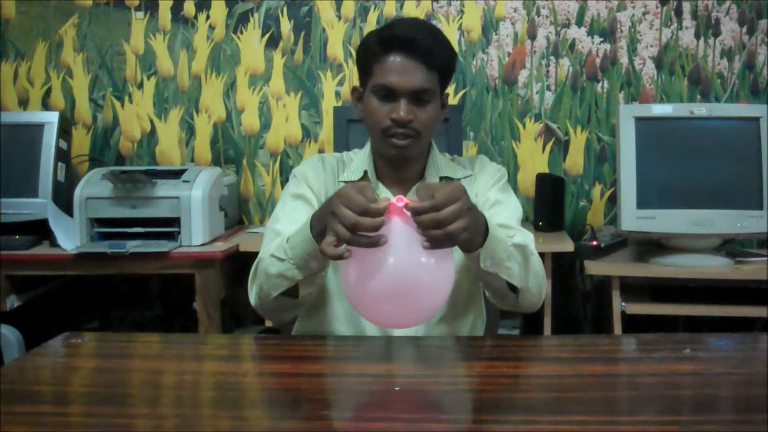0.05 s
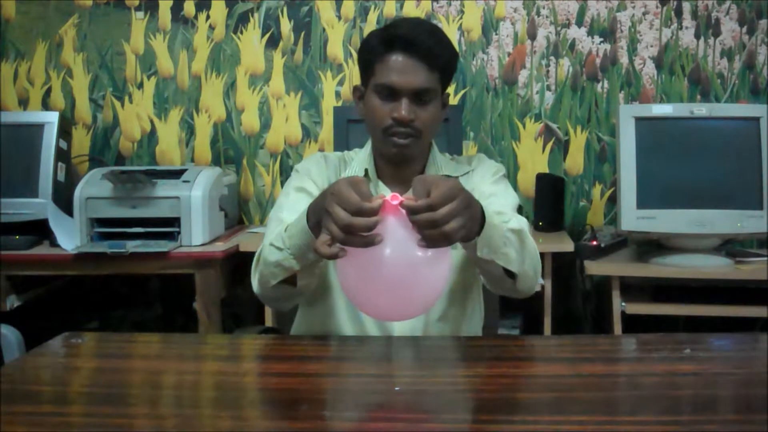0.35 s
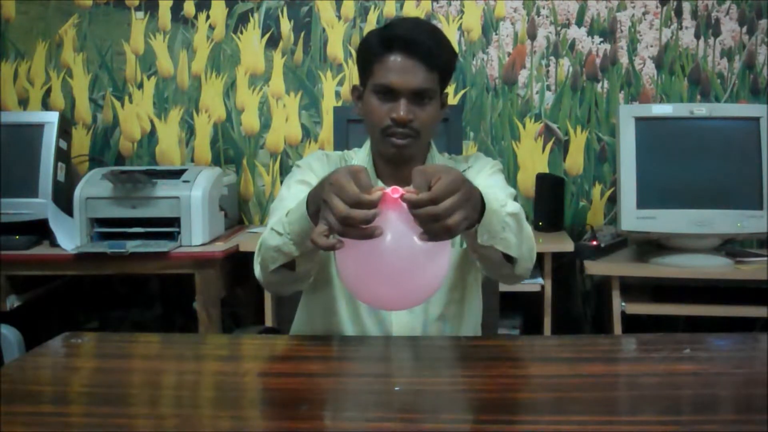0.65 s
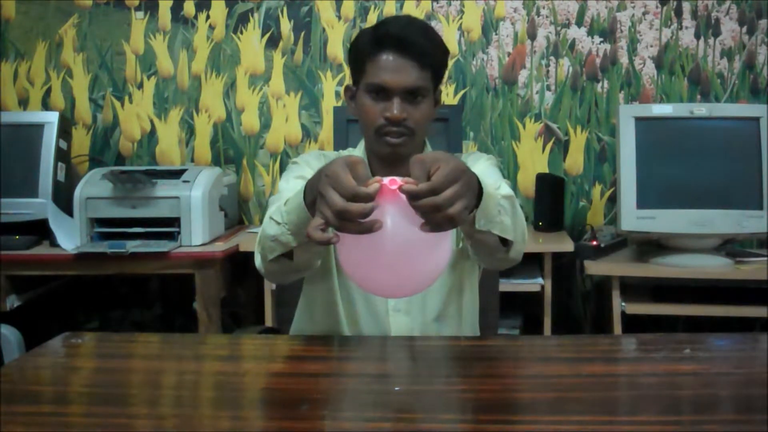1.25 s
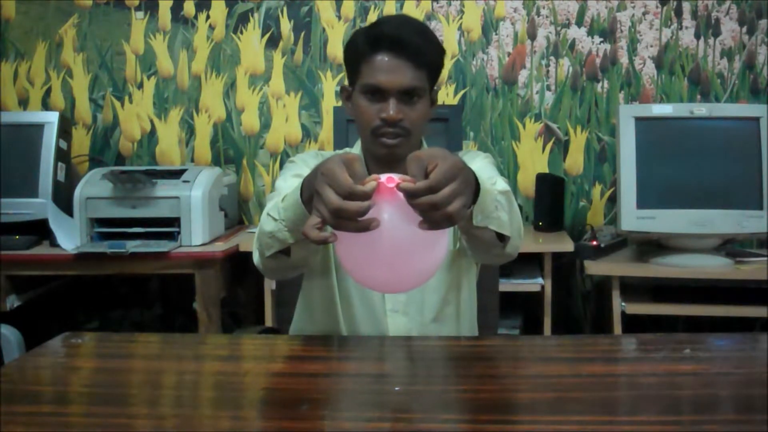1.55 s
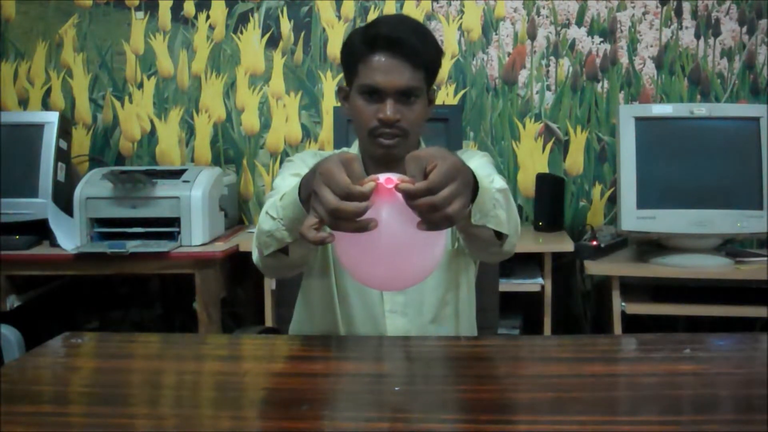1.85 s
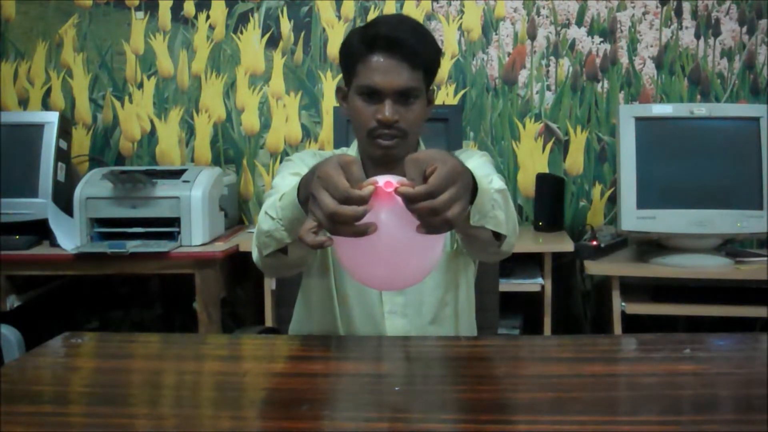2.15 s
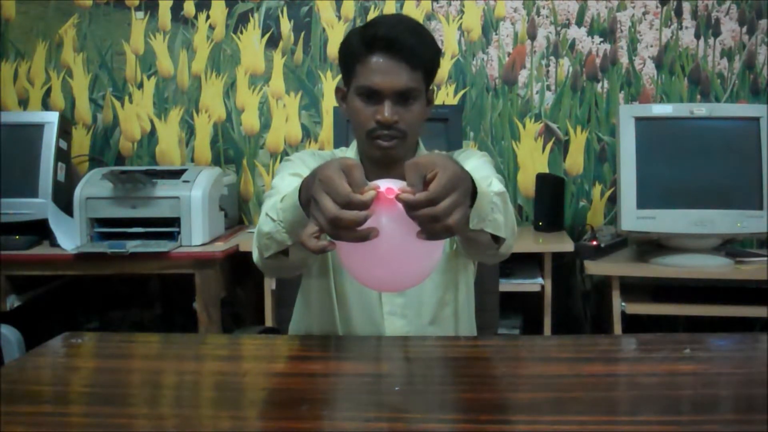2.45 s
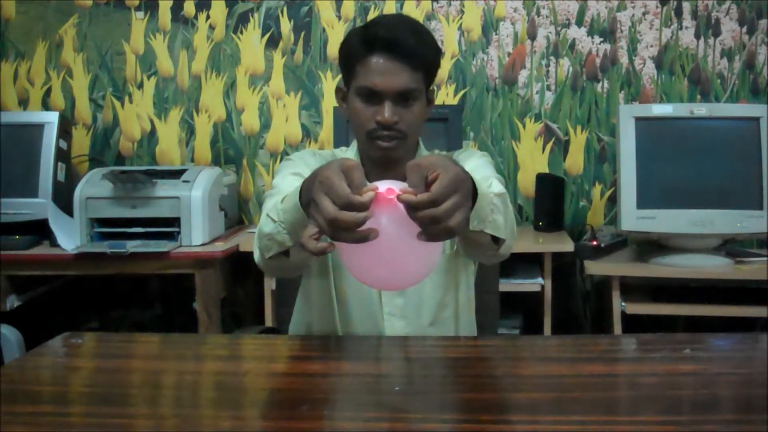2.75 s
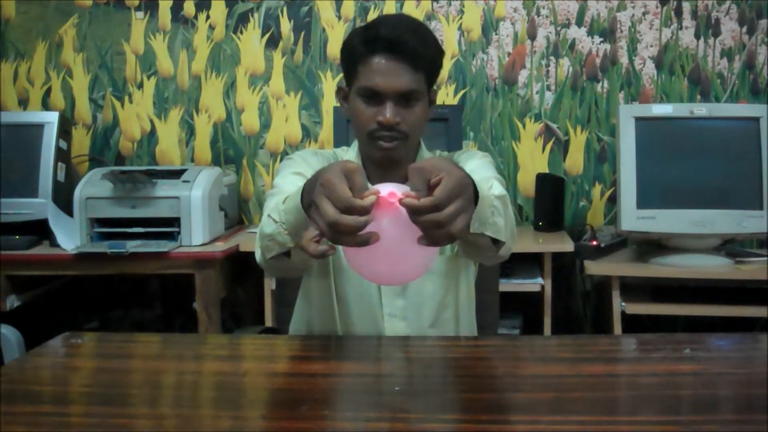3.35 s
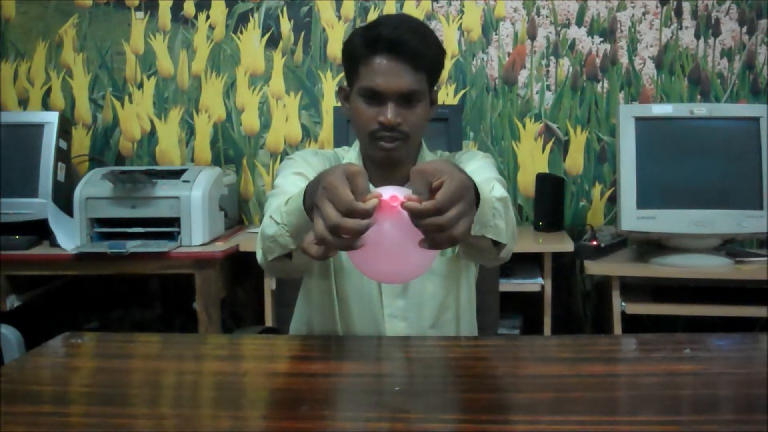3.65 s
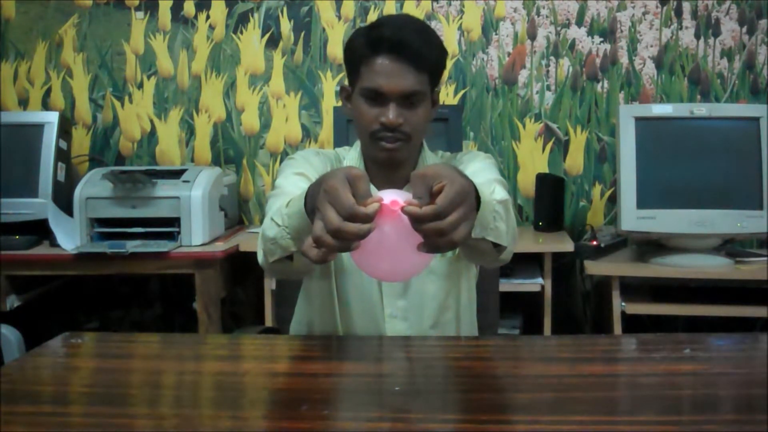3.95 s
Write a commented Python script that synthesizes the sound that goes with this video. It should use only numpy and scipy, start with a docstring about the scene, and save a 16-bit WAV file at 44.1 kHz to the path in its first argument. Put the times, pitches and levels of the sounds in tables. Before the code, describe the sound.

A balloon squeals for the whole four seconds as air escapes through its stretched neck. The high, shrill note warbles from about 0.2 to 0.6 seconds, then takes on a rubbery buzz. Its pitch sags slightly, and from about 2 seconds it grows increasingly ragged and hissy while staying about as loud. The small office adds a short echo, a faint equipment hum and a low rumble.

```python
"""Air squeals out through the stretched neck of a balloon in a small office.
The rubber lips slap shut about 950 times a second; the note warbles briefly, then a slower flap
of the neck makes it buzz. As the balloon empties the pitch sags and the squeal turns ragged and
hissy. Office equipment hums faintly behind, over a low room rumble."""
import sys
import numpy as np
from scipy import signal
from scipy.fft import rfft, irfft
from scipy.io import wavfile

SR = 44100
rng = np.random.default_rng(int(sys.argv[2]) if len(sys.argv) > 2 else 0)


def output_pcm(signal):
    """Save a mono or channel-first signal as 16-bit PCM at the path in sys.argv[1].

    Samples are clipped to [-1, 1] before scaling.
    """
    pcm = np.clip(np.atleast_2d(signal).T, -1, 1) * 32767
    wavfile.write(sys.argv[1], SR, np.round(pcm).astype(np.int16))


N = 176400
T = np.arange(N) / SR
BINS_HZ = np.maximum(np.arange(N + 1) * SR / (2 * N), 1)


def squeal(phase, strength):
    """The harmonics of the slapping rubber lips, locked into one sharp pulse per cycle."""
    # Level rides, before weighting. Each row: time in seconds, level of the fundamental in dB.
    first = [(0.0, -40), (0.15, -34.5), (0.19, -41.5), (0.6, -32), (0.73, -42), (0.78, -33.5), (0.87, -30),
             (0.96, -42.5), (1.05, -31.5), (1.1, -49), (1.21, -31), (1.35, -53.5), (1.4, -30),
             (1.86, -34.5), (2.08, -32), (2.15, -50), (2.19, -35), (2.28, -31.5), (2.72, -38.5),
             (2.75, -31), (3.02, -41), (3.06, -31), (3.61, -31.5), (3.8, -40.5), (3.94, -32), (4.0, -41)]
    # Each row: time in seconds, level of harmonic 2 in dB.
    second = [(0.0, -29.5), (0.09, -29.5), (0.32, -31.5), (0.87, -24.5), (0.91, -29.5), (1.14, -24.5),
              (1.17, -33.5), (1.25, -22), (1.55, -30.5), (1.71, -26.5), (1.75, -42), (1.77, -26.5),
              (1.97, -33.5), (2.04, -29.5), (3.97, -35), (4.0, -25)]
    # Each row: time in seconds, levels of harmonics 3, 4 and 5 in dB.
    upper = [(0.02, -30, -30, -25.5), (0.67, -26.5, -27.5, -25), (0.71, -38, -29.5, -18),
             (0.75, -27, -26, -30), (0.78, -30, -28, -20), (0.98, -27, -29, -24.5), (1.01, -30, -36, -24),
             (1.03, -26.5, -24.5, -19.5), (1.17, -32, -32, -27.5), (1.22, -26, -26.5, -25.5),
             (1.35, -32.5, -27, -24), (1.4, -27.5, -21, -27), (1.48, -33, -39, -27), (1.51, -27, -29, -30),
             (1.93, -31.5, -30.5, -28.5), (2.29, -31.5, -31, -27.5), (2.37, -35.5, -31.5, -30.5),
             (2.86, -31.5, -29, -25), (3.36, -35, -29.5, -28.5), (3.91, -29, -26.5, -25),
             (3.97, -32, -30, -26), (3.98, -30, -24, -26)]
    # Each row: time in seconds, levels of harmonics 6, 7 and all higher ones in dB.
    shrill = [(0.02, -27, -29, -21.5), (0.03, -19, -25, -22), (0.11, -19, -21.5, -20.5),
              (0.26, -22, -23.5, -25.5), (0.27, -15, -22, -24), (0.28, -20.5, -26, -26),
              (0.49, -27, -23.5, -23), (0.78, -26.5, -19.5, -23.5), (0.89, -28.5, -24, -23),
              (1.4, -25, -22, -21.5), (2.15, -31, -26, -22.5), (2.18, -28, -32, -21.5),
              (2.34, -26, -35, -17.5), (2.39, -30.5, -46, -24.5), (2.84, -22, -25.5, -19.5),
              (3.39, -29, -33, -21), (3.85, -25.5, -25, -21.5), (3.86, -22, -23, -20),
              (3.97, -24, -28, -23), (3.98, -28, -25, -21)]
    # Each entry: the weight in dB added to one harmonic's ride, lowest first.
    weights_db = [-2.5, -5.5, -1, 1.5, 3, -1, .5, -2.5, -8, -12.5, -14.5, -20, -23.5, -28.5, -29.5]
    sixth, seventh, treble = in_time(shrill)
    rides = in_time(first) + in_time(second) + in_time(upper) + [sixth, seventh]
    rides += [treble] * (len(weights_db) - len(rides))
    harmonics = (from_db(ride + weight) * np.sin(k * phase)
                 for k, (ride, weight) in enumerate(zip(rides, weights_db), 1))
    return np.sqrt(2) * strength * sum(harmonics)


def lip_motion(rough):
    """Phase and strength of the slaps, pushed about by the warble, the neck's flap and turbulence."""
    # The sagging note. Each row: time in seconds, slap rate in Hz.
    slap_rate = [(0, 983.6), (.15, 984.8), (.3, 1001), (.4, 981.1), (.55, 976.3), (.66, 951.4), (.88, 961),
                 (1.0, 940.2), (1.15, 949.5), (1.35, 941.7), (1.47, 908), (1.62, 900.8), (1.76, 915.6),
                 (1.9, 903.7), (2.12, 897), (2.25, 887.7), (2.34, 871.7), (2.44, 898.7), (2.62, 899.3),
                 (2.9, 895), (3.2, 881.5), (3.45, 879.4), (3.7, 899.5), (4, 898)]
    # The early warble. Each row: time in seconds, pitch swing in Hz.
    warble_swing = [(.12, 0), (.2, 16), (.3, 28), (.42, 38), (.52, 18), (.64, 0)]
    # The buzz of the flapping neck. Each row: time in seconds, depth from 0 to 1.
    flap_depth = [(0, 0), (.12, 0.48), (.24, 0), (.54, .02), (.7, 0.87), (1.5, 0.78), (2.6, 0.99),
                  (3.2, 0.47), (4, 0.56)]
    # Flap harmonics at full depth, lowest first. Each row: timing shift in cycles, strength swing 0-1.
    flap_shape = [(0.014, 0.12), (0.02, 0.23), (0.0051, 0.16)]
    warble_hz, warble_crest_s, swell_db_per_hz = 24.7, .312, 0.0886
    flap_hz, flap_wander_hz = 152.4, 1.79
    wander_hz, wander_per_s, jitter_cycles = 6, 25.17, 0.055
    shimmer_db, surge_db = -0.5, 1
    (pitch,), (swing,), (depth,) = in_time(slap_rate), in_time(warble_swing), in_time(flap_depth)
    warble = swing * np.cos(2 * np.pi * warble_hz * (T - warble_crest_s))
    phase = running_phase(pitch + warble + wander_hz * rough * drift(wander_per_s))
    phase += 2 * np.pi * jitter_cycles * rough * drift(per_s=137)
    shimmer = shimmer_db * rough * drift(per_s=110)
    surge = surge_db * drift(per_s=73)
    strength = from_db(shimmer + swell_db_per_hz * warble + surge)
    flap = running_phase(flap_hz + flap_wander_hz * drift(wander_per_s))
    for k, (shift, share) in enumerate(flap_shape, 1):
        phase += 2 * np.pi * shift * depth * np.sin(k * flap)
        strength *= 1 + share * depth * np.cos(k * flap)
    return phase, rms_one(strength)


def hiss(phase, strength, rough):
    """A puff of air each cycle rings the slit; the hiss grows louder and fuller as the lips roughen."""
    # Air rushing through the slit. Each row: frequency in Hz, relative level in dB.
    air_colour = [(400, -54), (750, -15.5), (1400, -14), (1750, -6), (2400, -6.5), (3200, -7.5),
                  (3700, -5.5), (5200, -6), (6400, 2.5), (8000, 0), (9500, -3.5), (12000, -15),
                  (14500, -24)]
    # The slit's gliding resonance. Each row: time in seconds, centre in Hz.
    slit_centre = [(0, 7700), (.8, 7350), (1.5, 8130), (2.1, 7900), (2.4, 8300), (2.75, 7630), (3.05, 7810),
                   (3.6, 8284), (3.8, 7807), (4, 7314)]
    air_db, slit_db = -23, -27  # at full roughness
    pulsing, rasp_top_hz = 0.64, 3800
    hiss_growth, rasp_growth = 0.62, 0.6  # powers of roughness
    rough = np.maximum(rough, 1e-4)
    puffs = rng.standard_normal(N) * strength * (1 + pulsing * np.cos(phase)) ** 2
    air = rms_one(filtered(puffs, from_db(over_hz(air_colour)[0])))
    slit = moving_resonance(air, in_time(slit_centre)[0], width_hz=500)
    rasp = filtered(air, 1 / (1 + (BINS_HZ / rasp_top_hz) ** 8))
    air = air - rasp + rasp * rough ** rasp_growth  # the low rasp comes in later than the top
    return rough ** hiss_growth * (from_db(air_db) * air + from_db(slit_db) * slit)


def office(x):
    """Direct sound plus a short, dense room tail that spreads wider towards the treble."""
    # Each row: frequency in Hz, tail against direct sound in dB, left-right likeness from 0 to 1.
    reverb = [(850, -1, 0.95), (1770, -0.5, 0.79), (2950, 1, 0.51), (5140, 1, 0.21), (7900, 2, 0.058),
              (14000, 5, .05)]
    t60_s, first_echo_s = 0.4, .002
    evenness = 0.55  # share by which the room's peaks and dips are levelled
    wet_db, alike = over_hz(reverb)
    wet = from_db(wet_db)
    tails = rng.standard_normal((2, N)) * from_db(-60 * T / t60_s) * (T > first_echo_s)
    mid, side = rfft(rms_one(tails) / np.sqrt(N), 2 * N)
    tail = np.sqrt((1 + alike) / 2) * mid + np.sqrt((1 - alike) / 2) * side * [[1], [-1]]
    response = (1 + wet * tail) / np.sqrt(1 + wet ** 2)
    ripple = np.sqrt(np.mean(np.abs(response) ** 2, axis=0))
    return filtered(x, response / ripple ** evenness)


def room_rumble():
    """A bed of low room noise, mostly in the centre."""
    # Each row: frequency in Hz, relative level in dB.
    colour = [(20, -13), (40, -8), (70, 1.5), (120, -3.5), (200, 3), (300, -0.5), (600, 2), (1200, -10),
              (2500, -27), (6000, -44)]
    level_db, side_db = -57.5, -10
    mid, side = rms_one(filtered(rng.standard_normal((2, N)), from_db(over_hz(colour)[0])))
    return from_db(level_db) * (mid + from_db(side_db) * side * [[1], [-1]])


def equipment_hum():
    """Office equipment holds three faint, steady tones."""
    # Each row: frequency in Hz, rms level in dB.
    tones = [(75.4, -75.5), (183, -67.5), (478, -53.5)]
    return sum(np.sqrt(2) * from_db(db) * np.sin(2 * np.pi * (hz * T + rng.random())) for hz, db in tones)


def from_db(db):
    """Decibels to gain."""
    return 10 ** (np.asarray(db) / 20)


def rms_one(x):
    """Scale to an rms of one."""
    return x / np.sqrt(np.mean(x ** 2) + 1e-20)


def in_time(rows):
    """Each column of a curve at every sample."""
    seconds, *columns = np.transpose(rows)
    return [np.interp(T, seconds, c) for c in columns]


def over_hz(rows):
    """Each column of a spectrum at every frequency bin."""
    hz, *columns = np.transpose(rows)
    return [np.interp(np.log(BINS_HZ), np.log(hz), c) for c in columns]


def filtered(x, response):
    """Apply a frequency response."""
    return irfft(rfft(x, 2 * N) * response)[..., :N]


def drift(per_s):
    """Smooth random motion with an rms of one."""
    return rms_one(filtered(rng.standard_normal(N), 1 / (1 + (BINS_HZ / per_s) ** 2)))


def running_phase(hz):
    """Phase of a changing frequency, in radians."""
    return 2 * np.pi * np.cumsum(hz) / SR


def moving_resonance(x, hz, width_hz):
    """Ring a resonance whose centre glides; rms one."""
    carrier = np.exp(1j * running_phase(hz))
    pole = np.exp(-np.pi * width_hz / SR)
    ringing = signal.lfilter([1], [1, -pole], x / carrier)
    return rms_one(np.real(carrier * ringing))


def scene():
    """The balloon squeals and hisses in the office, over rumble and hum."""
    # Unsteadiness of the lips. Each row: time in seconds, roughness from 0 to 1.
    roughness = [(0, 0.26), (.1, 0.55), (.16, 0.28), (.21, .005), (.52, 0), (.58, 0.23), (.68, 0.38),
                 (1.3, 0.38), (1.6, 0.31), (2.1, .45), (2.25, 0.66), (3.0, .85), (4, 0.93)]
    ragged_loss_db = 1.45  # the tone gives way to hiss by this much at full roughness
    rough, = in_time(roughness)
    phase, strength = lip_motion(rough)
    tone = from_db(-ragged_loss_db * rough ** 2) * squeal(phase, strength)
    return office(tone + hiss(phase, strength, rough)) + room_rumble() + equipment_hum()


def record(dry):
    """Each microphone adds its own colour; rare peaks are rounded and the top is cut steeply."""
    # Each row: frequency in Hz, left gain in dB, right gain in dB.
    mic_colour = [(535, 0, 1), (1990, 7.5, 8), (3700, -0.5, 1), (4860, -4, -2.5), (6530, -1, 6.5),
                  (6630, -5, -1), (8070, 5.5, -5.5), (9150, 6, -13), (9700, 4.5, -3), (11400, 4.5, -8.5),
                  (13900, 9, -14)]
    ceiling, cutoff_hz = .85, 14300
    coloured = filtered(dry, from_db(over_hz(mic_colour)))
    rounded = coloured / (1 + (coloured / ceiling) ** 8) ** (1 / 8)
    return filtered(rounded, 1 / np.sqrt(1 + (BINS_HZ / cutoff_hz) ** 300))


dry = scene()
out = record(dry)
output_pcm(out)
```